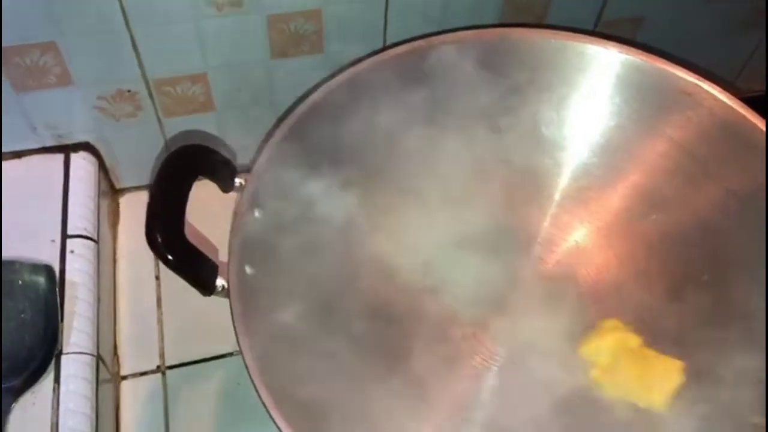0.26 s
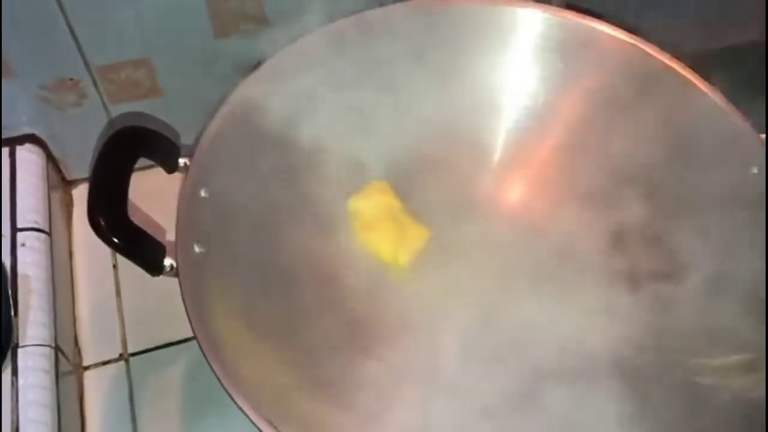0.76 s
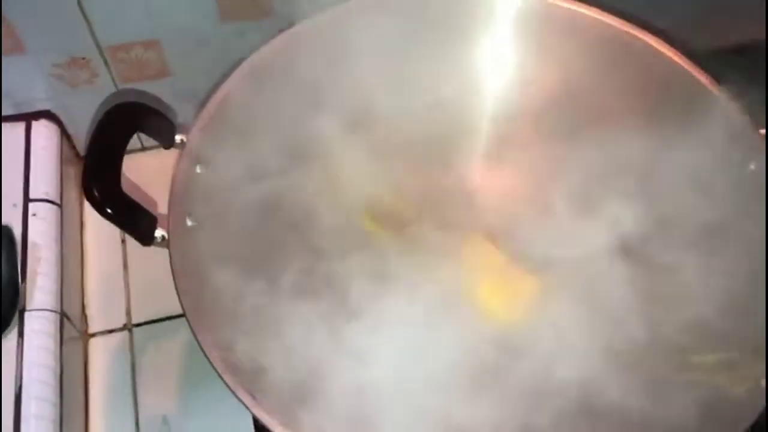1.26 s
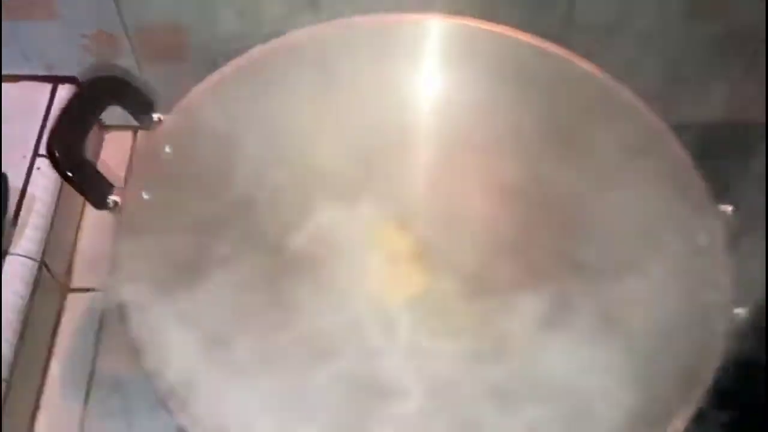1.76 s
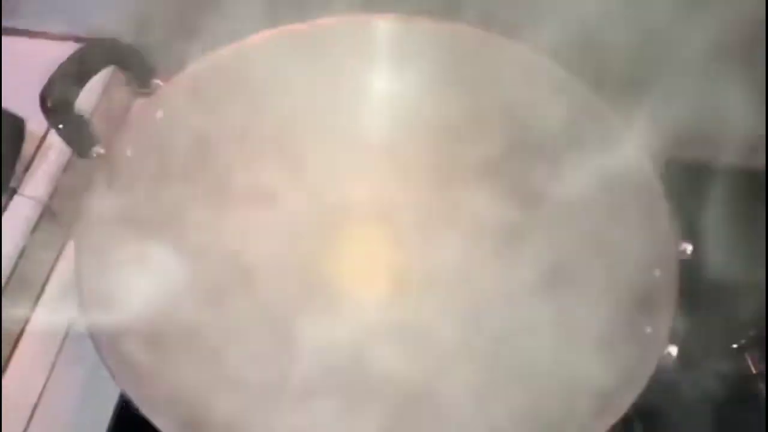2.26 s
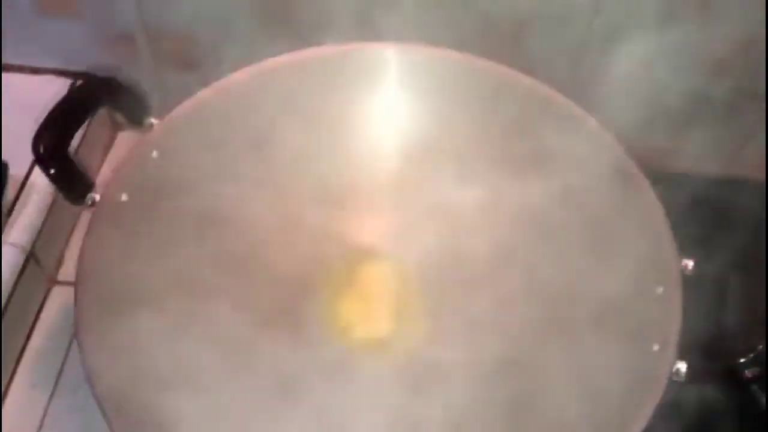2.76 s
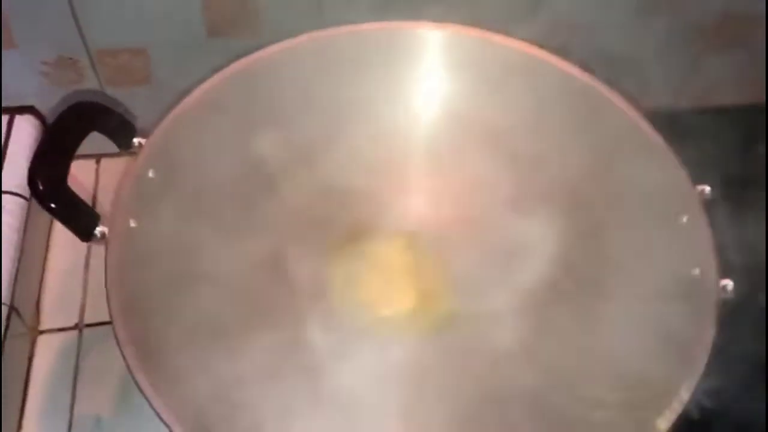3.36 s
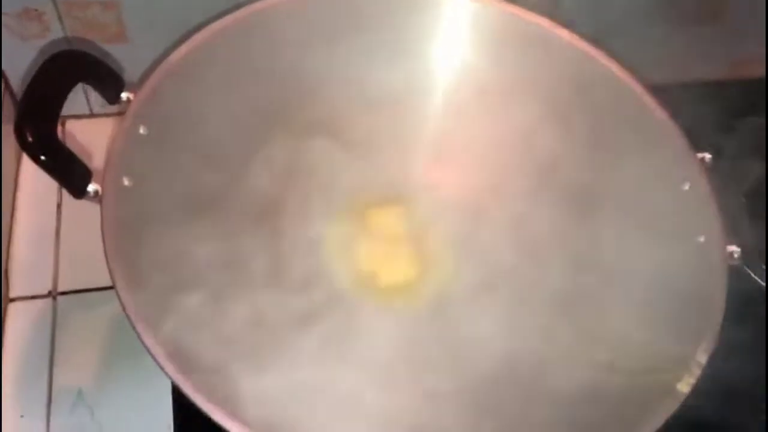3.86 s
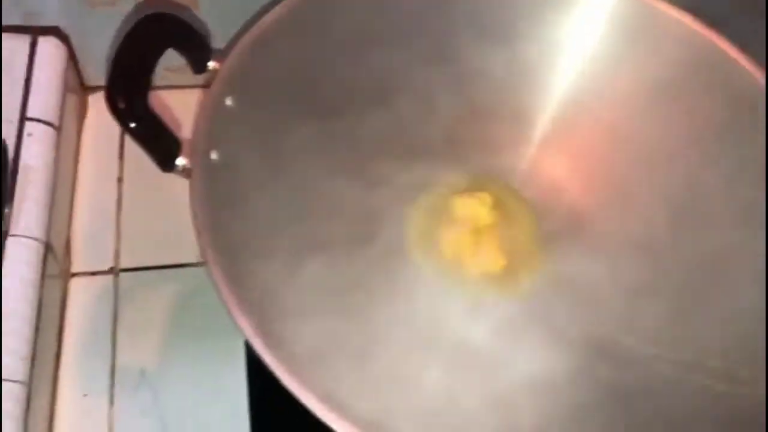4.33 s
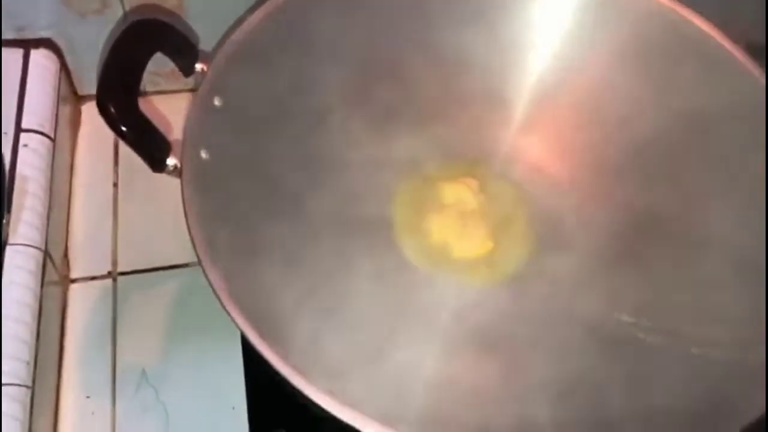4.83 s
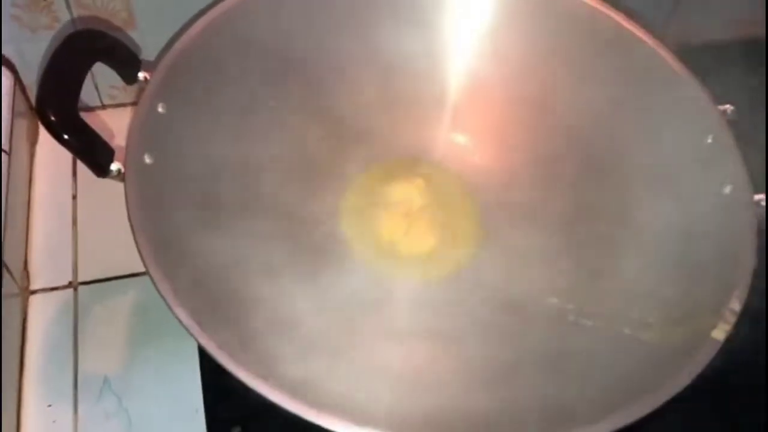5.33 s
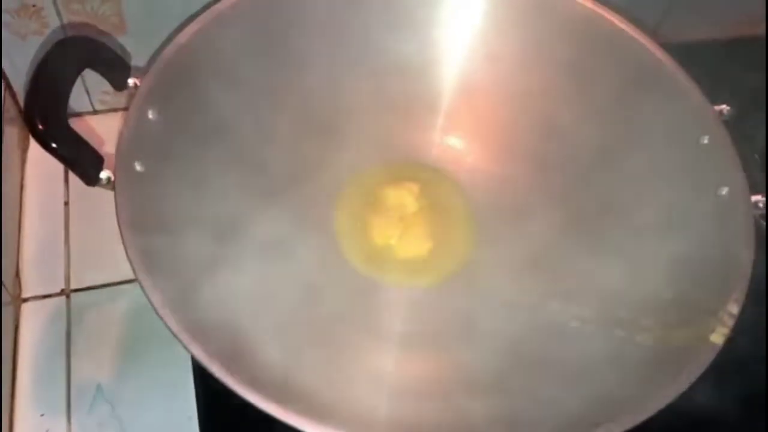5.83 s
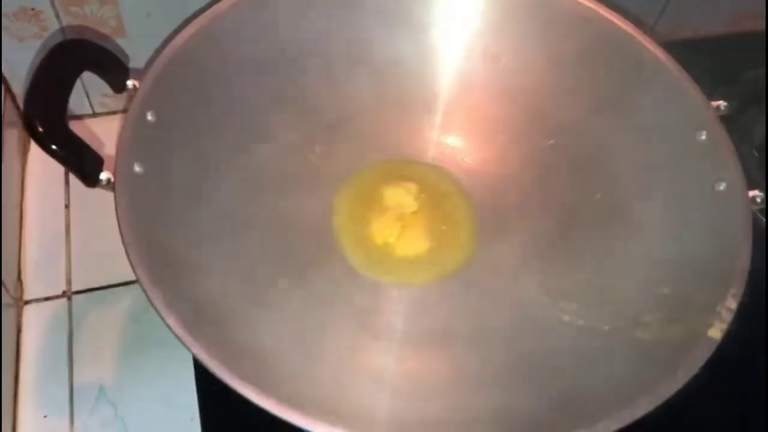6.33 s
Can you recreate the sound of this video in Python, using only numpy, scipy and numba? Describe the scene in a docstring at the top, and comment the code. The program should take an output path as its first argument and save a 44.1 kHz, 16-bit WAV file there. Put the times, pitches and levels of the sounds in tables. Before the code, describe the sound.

Butter sizzles loudly in a hot wok, a bright, dense hiss with a couple of sharp spits over a faint low hum.

```python
"""A lump of butter skids round a very hot steel wok while a motor hums low in the kitchen. Its water
boils off in thousands of tiny bursts a second, a bright hiss that the bowl reflects into a hand-held
phone. Near two seconds the lump settles and melts into a pool, and the sizzle grows fuller. Something
knocks once, four faint whistles waver in the sizzle, and two droplets spit loudly in the fat."""
import sys
import numpy as np
from scipy import signal
from scipy.fft import rfft, irfft
from scipy.io import wavfile
from scipy.ndimage import uniform_filter1d
from numba import njit

SR = 44100
rng = np.random.default_rng(int(sys.argv[2]) if len(sys.argv) > 2 else 0)


def digitize_waveform(pressure):
    """Quantize a signal to 16-bit integers and store it at the path in sys.argv[1].

    Rows of a 2-D input are taken as channels; values are limited to [-1, 1].
    """
    field = np.atleast_2d(pressure).T
    bounded = np.clip(field, -1, 1)
    quanta = np.round(bounded * 32767).astype(np.int16)
    wavfile.write(sys.argv[1], SR, quanta)


N = 290844
TIME = np.arange(N) / SR


def undb(db):
    """Decibels to gain."""
    return 10 ** (np.asarray(db) / 20)


def unit(x):
    """Scale to rms 1."""
    return x / np.sqrt(np.mean(x ** 2))


def curves(table):
    """Turn rows that start with a time in seconds into one automation curve per further column."""
    times, *columns = np.transpose(table)
    return [np.interp(TIME, times, column) for column in columns]


def colour(x, points):
    """Equalise along a curve of (Hz, dB) points."""
    hz, db = np.transpose(points)
    bins = np.maximum(np.fft.rfftfreq(N, 1 / SR), 1)
    return irfft(rfft(x) * undb(np.interp(np.log(bins), np.log(hz), db)), N)


def band(x, low_hz, high_hz, order=4):
    """Butterworth band-pass."""
    return signal.sosfilt(signal.butter(order, [low_hz, high_hz], "band", fs=SR, output="sos"), x)


def wander(per_s):
    """A smooth random drift of rms 1 that heads for a new value per_s times a second."""
    hold = int(SR / per_s)
    steps = np.repeat(rng.standard_normal(N // hold + 1), hold)
    return unit(uniform_filter1d(uniform_filter1d(steps, hold), hold)[:N])


def ring(hz, t60):
    """A sine that dies by 60 dB in t60 seconds."""
    t = np.arange(int(t60 * SR) + 2) / SR
    return np.sin(2 * np.pi * hz * t) * np.exp(-np.log(1000) * t / t60)


def impulses(cues):
    """One click for each (seconds, dB) cue."""
    clicks = np.zeros(N)
    for start_s, db in cues:
        clicks[int(start_s * SR)] += undb(db)
    return clicks


@njit
def resonance(x, hz, q):
    """State-variable band-pass with a moving centre, gain 1 there."""
    y, mid, low = np.empty(len(x)), 0., 0.
    for i in range(len(x)):
        g = np.tan(np.pi * hz[i] / SR)
        v = (mid + g * (x[i] - low)) / (1 + g * (g + 1 / q))
        mid, low, y[i] = 2 * v - mid, low + 2 * g * v, v / q
    return y


def pooled(smear_share=0.23, smear_dry_s=0.7, settles_s=1.93, fill_s=1.38):
    """How far the butter has pooled, 0-1: a first smear boils away, then a pool grows round the lump."""
    smear = smear_share * np.maximum(1 - TIME / smear_dry_s, 0)
    pool = 1 - np.exp(-np.maximum(TIME - settles_s, 0) / fill_s)
    return np.clip(smear + pool, 0, 1)


def bubbles(low_hz, high_hz, per_s, cycles, spread_db, flurry_db, sizes=12):
    """Bubbles of many sizes burst at random, each ringing a few cycles; a few stand out from the rest."""
    fizz = np.zeros(N)
    for hz in np.linspace(low_hz, high_hz, sizes):
        chance, strength = rng.random(N), rng.standard_exponential(N)
        born = np.flatnonzero(chance < per_s / sizes / SR)
        kicks = np.zeros(N)
        kicks[born] = undb(spread_db * np.minimum(strength[born], 5)) * (-1) ** born
        pops = unit(signal.oaconvolve(kicks, ring(hz, cycles / hz))[:N])
        fizz += pops * undb(flurry_db * wander(18))  # bubbles of one size come in flurries
    # flatten the tone, so that metal and pool set the colour
    spectrum = rfft(fizz)
    power = uniform_filter1d(np.abs(spectrum) ** 2, size=2001)
    return irfft(spectrum / np.sqrt(power + power.max() * 1e-6), N)


def sizzle(usual_boil_db=-19, flare_s=0.13):
    """Water boils off as large bubbles, small bubbles and spray; the pool favours the bubbles."""
    # The boil surges as the lump meets fresh hot steel. Each row: time in seconds, vigour in dB.
    boil = [(0.0, -32), (0.09, -23.5), (0.26, -20.5), (0.51, -24), (0.75, -18.5), (0.99, -20), (1.51, -20),
            (1.82, -22.5), (2.57, -15.5), (2.83, -17.5), (3.12, -16.5), (3.82, -18.5), (3.95, -15.5),
            (5.16, -15), (5.47, -20.5), (5.99, -15), (6.43, -15.5), (6.6, -17)]
    # Brief flares, and one dip, in the bubbles. Each row: centre in seconds, level change in dB.
    flares = [(.27, .9), (.9, 0.5), (2.12, 0.3), (2.6, -1.4), (4.05, 0.2), (5.68, 0.4)]
    # The bright tone of frying on bare metal. Each row: frequency in Hz, gain in dB.
    metal_eq = [(200, -18.5), (430, -20), (610, -14.5), (900, -16), (1250, -11), (1600, -12.5),
                (1950, -7.5), (3100, -5), (4400, 0), (6600, -0.5), (9000, 2.5), (11400, 3.5), (12000, -5)]
    # The tone of frying in the pool. Each row: frequency in Hz, gain in dB.
    pool_eq = [(200, -33), (430, -31.5), (700, -24), (1000, -19), (1270, -15), (1640, -15), (1880, -10.5),
               (2150, -12.5), (2500, -6), (3100, -5), (4400, -0.5), (6000, 5), (7800, -0.5), (11400, -1),
               (12000, -13.5)]
    melt = pooled()
    surge_db = curves(boil)[0] - usual_boil_db
    flare = undb(sum(db * np.exp(-(2 * (TIME - at_s) / flare_s) ** 2) for at_s, db in flares))

    def layer(grains, metal_db, pool_adds_db, follow):
        """Crossfade from metal to pool while the level rides the boil."""
        blend = (1 - melt) * unit(colour(grains, metal_eq)) + melt * unit(colour(grains, pool_eq))
        return undb(metal_db + pool_adds_db * melt + follow * surge_db) * blend

    large = bubbles(545, 4890, per_s=24000, cycles=6.3, spread_db=1.8, flurry_db=0.87)
    small = bubbles(4000, 8050, per_s=22000, cycles=10.7, spread_db=3.0, flurry_db=1.63)
    spray = bubbles(7750, 11250, per_s=24000, cycles=12.7, spread_db=1.75, flurry_db=1.5)
    return (layer(flare * band(large, 200, 4500, order=6), metal_db=-26.5, pool_adds_db=3.46, follow=0.53)
            + layer(flare * band(small, 4500, 8000), metal_db=-23.5, pool_adds_db=1.86, follow=0.62)
            + layer(band(spray, 8000, 12500), metal_db=-21, pool_adds_db=-3.5, follow=0.85))


def pings(low_hz, high_hz, t60, db, count=160):
    """Now and then a bubble rings on at its own pitch, louder as the pool deepens."""
    track = np.zeros(N + SR)
    for when, pitch, size in rng.random((count, 3)):
        ping = size * ring(low_hz * (high_hz / low_hz) ** pitch, t60)
        start = int(when * N)
        track[start:start + len(ping)] += ping
    return track[:N] * undb(db) * (1 + pooled()) / 2


def wok(x, lift_hz=1520, octaves_per_s=0.19, lift_share=0.15, lift_q=2.1, notch_q=3.8):
    """The steel bowl rings faintly, lifts one climbing band, cancels another and sends back a reflection."""
    # The steel's faint, steady rings. Each row: pitch in Hz, width in Hz, share added.
    steel = [(580, 55, .35), (728, 45, .35), (865, 35, .35), (1070, 35, .45), (1610, 50, .35),
             (1810, 100, .2), (2280, 70, .25)]
    # A notch sweeps the hiss as the lump skids, and holds still from three seconds on.
    # Each row: time in seconds, centre in Hz, depth from 0 to 1.
    swirl = [(0, 8000, 0), (.33, 6900, 0.6), (.6, 6200, 0), (.88, 10800, 0.34), (1.1, 8000, 0.24),
             (1.9, 6400, 0), (2.38, 5500, 0.16), (3, 6100, 0.3)]
    x = x + sum(share * resonance(x, np.full(N, float(hz)), hz / width) for hz, width, share in steel)
    lift = lift_share * resonance(x, lift_hz * 2 ** (octaves_per_s * TIME), lift_q)
    notch_hz, depth = curves(swirl)
    notch = depth * resonance(x, notch_hz, notch_q)
    # the far wall's reflection arrives ever later as the phone drifts
    wall_share, lag_s, drift_s_per_s = 0.064, 0.0027, 0.00009
    reflection = wall_share * np.interp(TIME - lag_s - drift_s_per_s * TIME, TIME, x)
    return x + lift - notch + reflection


def kitchen(x, wet_db, t60):
    """Add the short diffuse tail of a small tiled room."""
    t = np.arange(SR // 2) / SR
    tail = rng.standard_normal(len(t)) * np.exp(-np.log(1000) * t / t60) * (t > .005)
    return x + undb(wet_db) * signal.fftconvolve(x, tail / np.linalg.norm(tail))[:N]


def motor(rumble_db):
    """A motor, likely a fan, hums with a slight beat over a soft rumble."""
    # The tones of the hum. Each row: pitch in Hz, rms level in dB, waver in dB.
    hum_tones = [(48.4, -69, 3), (147.2, -51, 1.3), (139, -62, 5), (246, -67, 3)]
    # The kitchen's low rumble. Each row: frequency in Hz, gain in dB.
    rumble_eq = [(20, -27), (38, -20), (60, -4), (84, 4), (108, 1.5), (138, 7), (165, -3.5), (188, 3),
                 (208, -5), (320, 0), (440, -6.5), (900, -42), (3000, -40)]
    hum = np.zeros(N)
    for hz, db, waver_db in hum_tones:
        level = np.sqrt(2) * undb(db + waver_db * wander(9))
        hum += level * np.sin(2 * np.pi * hz * TIME + 0.26 * wander(6.7))
    return hum + undb(rumble_db) * unit(colour(rng.standard_normal(N), rumble_eq))


def spits(per_s, small_db):
    """Water droplets explode in the fat with a short, bright snap; small ones multiply with the pool."""
    # The two loud droplets. Each row: start in seconds, strength in dB.
    loud_spits = [(4.041, -2), (6.211, -4)]
    chance, size = rng.random(N), rng.standard_normal(N)
    small = (chance < per_s * pooled() / SR) * undb(small_db + 2.5 * np.clip(size, -2, 2))
    snaps = signal.oaconvolve(impulses(loud_spits) + small, ring(hz=5000, t60=0.0013))[:N]
    return band(snaps, 2200, 10000, order=2)


def knock(gain_db):
    """A dull knock, perhaps a utensil put down, rattles briefly and dies in the room."""
    # Light touches, the knock, a bounce and a faint late tap. Each row: start in seconds, strength in dB.
    hits = [(2.298, -23.5), (2.353, -21), (2.360, -14), (2.371, -23), (5.498, -30)]
    # The ring of the knocked thing. Each row: pitch in Hz, relative level in dB, t60 in seconds.
    modes = [(333, -8.5, 0.054), (412, -14, 0.058), (474, -10, 0.091), (530, -11, 0.073), (640, -9.5, 0.06),
             (720, -16, .05), (910, -0.5, 0.076), (1060, -1, 0.059), (1270, -8.5, .04), (1435, -5, 0.065),
             (1620, -4.5, 0.056), (1790, 1.5, 0.043), (2150, -8, 0.037), (2660, -15, .03)]
    push = impulses(hits)
    body = np.zeros(N)
    for k, (hz, db, t60) in enumerate(modes):
        body += (-1) ** k * undb(db) * signal.oaconvolve(push, ring(hz, t60))[:N]
    return kitchen(undb(gain_db) * body, wet_db=-5.5, t60=0.29)


def faint_whistles(length_s, waver_hz):
    """Four faint, brief, wavering tones near 3 kHz swell and fade in the sizzle."""
    # Each row: centre in seconds, pitch in Hz, rms level at the crest in dB.
    whistles = [(3.268, 2845, -27.5), (3.48, 3100, -30), (3.587, 2920, -29), (3.935, 2870, -27)]
    phase_drift = 2 * np.pi * np.cumsum(waver_hz * wander(200)) / SR
    track = np.zeros(N)
    for at_s, hz, db in whistles:
        swell = np.sqrt(2) * undb(db) * np.exp(-(2 * (TIME - at_s) / length_s) ** 2)
        track += swell * np.sin(2 * np.pi * hz * TIME + phase_drift)
    return track


def scene():
    """Everything reaches one microphone, the same in both channels; the close wok is nearly dry."""
    frying = sizzle() + spits(per_s=12, small_db=-6) + pings(2996, 9480, t60=0.056, db=-17)
    pan = kitchen(wok(frying), wet_db=-14, t60=0.12)
    mono = pan + faint_whistles(length_s=0.033, waver_hz=35) + knock(gain_db=-6) + motor(rumble_db=-50.5)
    return np.array([mono, mono])


def record(dry):
    """The phone cuts the top steeply."""
    top_hz = 11800
    return signal.sosfilt(signal.ellip(10, .1, 90, top_hz, fs=SR, output="sos"), dry)


dry = scene()
out = record(dry)
digitize_waveform(out)
```